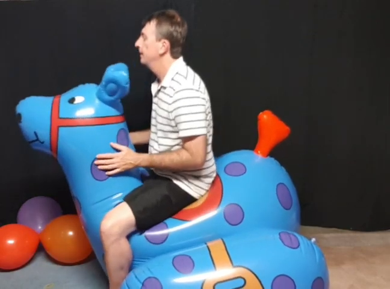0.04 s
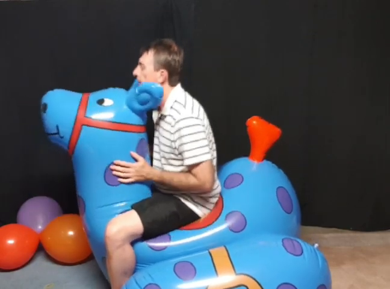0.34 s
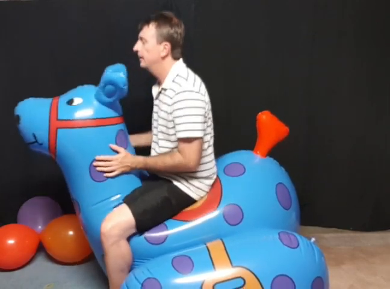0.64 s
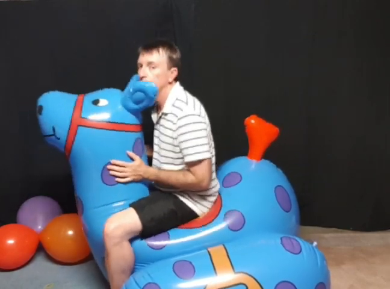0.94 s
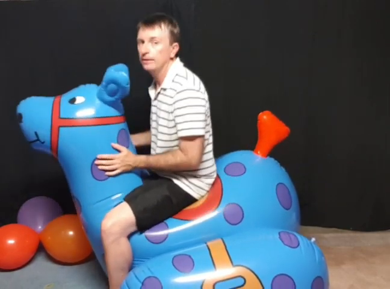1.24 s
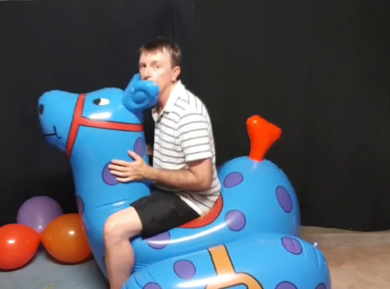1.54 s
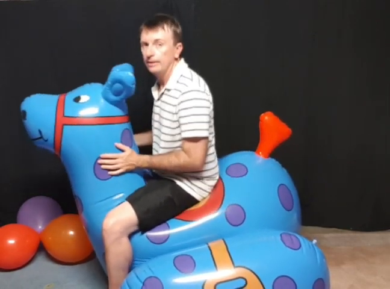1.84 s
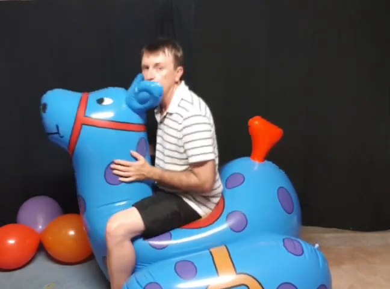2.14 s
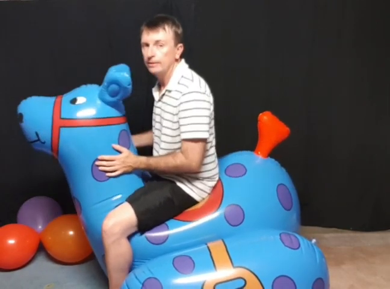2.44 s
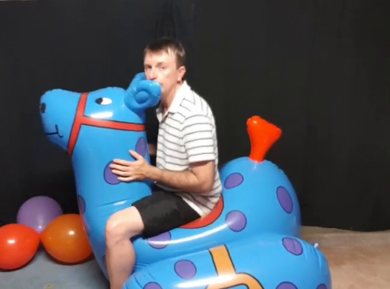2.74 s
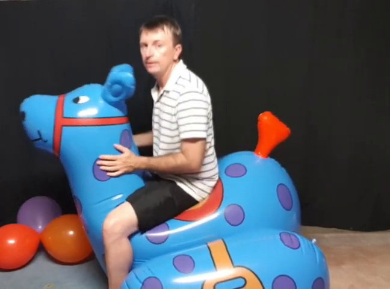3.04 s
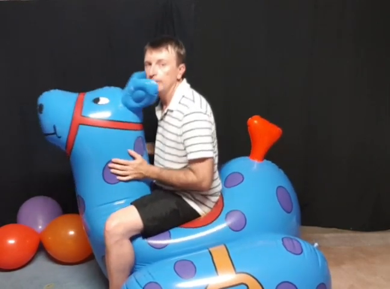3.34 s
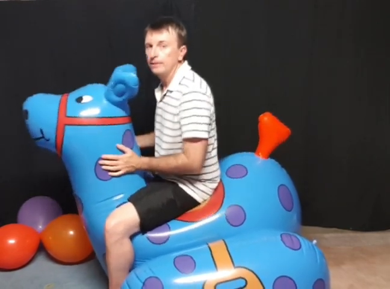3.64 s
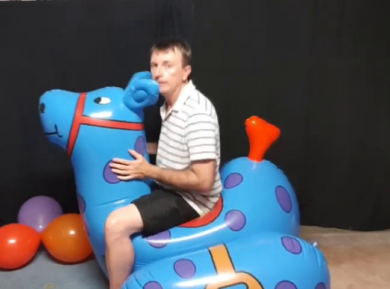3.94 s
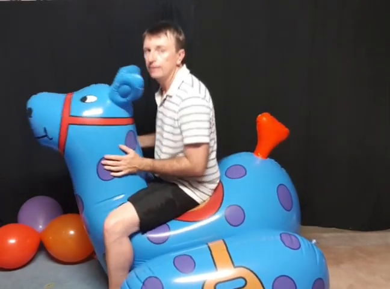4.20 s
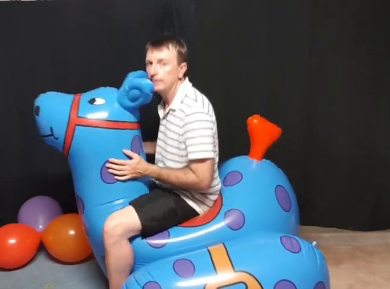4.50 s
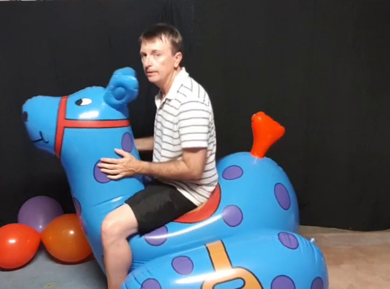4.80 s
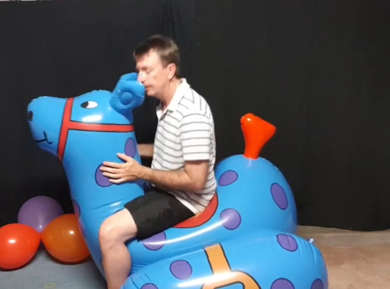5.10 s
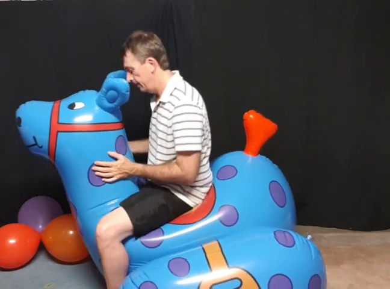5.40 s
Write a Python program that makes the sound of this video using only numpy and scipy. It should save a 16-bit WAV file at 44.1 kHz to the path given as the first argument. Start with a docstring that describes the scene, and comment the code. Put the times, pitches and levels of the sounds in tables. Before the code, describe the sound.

A person bounces on a large inflatable vinyl toy, nine times at an even pace. Each sinking makes a low, rubbery creak that slows, turns ragged and breaks into hard, hollow thumps, with a softer creak on the rebound. Folds crinkle lightly and cloth scuffs faintly. The bounces ease off, and one last creak swells at the end. It sounds fairly close, in a small, dry room with quiet rumble and hiss.

```python
"""A small curtained room: a person bounces on a large inflatable vinyl ride-on toy about every 0.6 s.
Each sinking and each rebound drags vinyl over vinyl: a low stick-slip creak that slows and turns ragged.
Under full weight the skin lets go in hard jerks that thump the air chamber, and the toy throbs deeply.
Its folds crinkle, cloth scuffs and skin squeaks faintly on the vinyl, over quiet rumble and hiss.
At the end the rider leans slowly forward into one last creak."""
import sys
import numpy as np
from scipy import signal
from scipy.fft import rfft, irfft
from scipy.io import wavfile
from scipy.ndimage import uniform_filter1d

SR = 44100
rng = np.random.default_rng(int(sys.argv[2]) if len(sys.argv) > 2 else 0)


def wrap_up_sound(samples):
    """Save the sound to the file named by the first command line argument, as 16-bit audio."""
    columns = np.atleast_2d(samples).T
    # keep every value between -1 and 1, then stretch to whole-number steps
    tamed = np.clip(columns, -1, 1)
    steps = np.round(tamed * 32767).astype(np.int16)
    wavfile.write(sys.argv[1], SR, steps)


N = 249606

# the rider sinks in, with layer levels ahead of the mix trims:
# (start [s], attack [s], push [s], opening slip rate [1/s], creak [dB], air chamber [dB], crinkle [dB])
SINKS = [(.26, 0.11, 0.12, 196, -26.5, -25.5, -48.5), (.858, 0.16, 0.11, 151, -27, -26.5, -48.5),
         (1.469, 0.13, 0.13, 151, -28, -28.5, -50.5), (2.075, 0.11, .121, 263, -28, -27, -49.5),
         (2.672, 0.14, 0.12, 175, -26.5, -26, -47.5), (3.298, 0.097, 0.13, 212, -29.5, -30.5, -52.5),
         (3.889, 0.13, .133, 200, -27.5, -28, -50), (4.511, 0.074, 0.11, 172, -29, -29.5, -51.5),
         (5.103, 0.099, 0.1, 173, -34, -29, -55)]
# the toy springs back: same columns
REBOUNDS = [(-.06, 0.049, 0.13, 161, -44.5, -41.5, -60.5), (.553, 0.054, 0.1, 250, -40, -42, -62),
            (1.15, 0.058, 0.085, 293, -38.5, -41, -63.5), (1.766, 0.052, 0.07, 255, -38.5, -45, -65.5),
            (2.367, 0.055, 0.087, 226, -37, -41.5, -59), (2.968, 0.063, 0.093, 263, -34, -41.5, -57),
            (3.587, 0.08, 0.083, 262, -34, -43, -58), (4.19, 0.079, 0.087, 233, -34, -44.5, -56.5),
            (4.841, 0.035, 0.046, 190, -46, -50.5, -78)]
# level curves of the closing lean: (time [s], creak [dB], air chamber [dB], crinkle [dB])
LEAN = [(5.38, -86, -66, -92), (5.42, -75, -51, -101), (5.51, -62, -42.5, -88), (5.555, -56.5, -46, -67.5),
        (5.635, -46.5, -39, -59), (5.66, -31, -37, -51)]
# body tone of the air chamber: (frequency [Hz], relative level [dB])
CHAMBER_TONE = [(25, -39.5), (42, -24), (56, -12.5), (75, -11), (100, -5.5), (135, -5.5), (170, 1),
                (220, -3.5), (290, -11.5), (500, -30), (1500, -101.5)]


def slips(ragged, size_spread_db=6, shimmer_db=2, stray=.45, count=90):
    """Vinyl sticks and slips on vinyl: a click train in which each stick tends to outlast the last."""
    out, step = np.zeros(N), np.arange(count)
    rows = strokes()
    ends = [row[0] for row in rows[1:]] + [N / SR]
    for (start, per_s, slowing, *_), end in zip(rows, ends):
        chance = rng.standard_normal((4, count))
        stick_s = (1 + slowing) ** step / per_s
        due = start + np.cumsum(stick_s) - stick_s
        disorder = np.interp(due * SR, np.arange(N), ragged)
        # a second, weaker patch of the contact lets go halfway through each stick
        for k, share in enumerate((1, .33)):
            times = due + stick_s * (k / 2 + .5 * disorder * chance[k])
            spread_db = shimmer_db + size_spread_db * disorder
            sizes = share * from_db(spread_db * np.clip(chance[k + 2], -2, 2))
            out -= clicks(times, sizes * (times > 0) * (times < end))
    # the rim of the contact gives way in small random slips
    return out + stray * ragged * grains(per_s=1100, spread_db=2.5)


def strokes(lean_slips_per_s=110):
    """Every sinking, rebound and lean in order of time: (start [s], opening slip rate [1/s], *course)."""
    # course: (growth per stick [share], opening raggedness [0-1], fraying time scale [s])
    sink_course, rebound_course, lean_course = (.024, .035, .16), (.042, .061, .22), (.012, .4, .087)
    rows = [(LEAN[0][0], lean_slips_per_s, *lean_course)]
    for table, course in ((SINKS, sink_course), (REBOUNDS, rebound_course)):
        rows += [(start, per_s, *course) for start, _, _, per_s, *_ in table]
    return sorted(rows)


def raggedness(ceiling=0.6935):
    """Each stroke loses its even rhythm as the load grows."""
    start, _, _, opening, fray_s = np.transpose(strokes())
    t = np.arange(N) / SR
    stroke = np.maximum(np.searchsorted(start, t, side="right") - 1, 0)
    age = t - start[stroke]
    return np.clip(opening[stroke] + (age / fray_s[stroke]) ** 2, 0, ceiling)


def rubbing_levels():
    """The rider's moves add up to three envelopes in dB: creak, air chamber and crinkle."""
    # envelope of a sinking, one row a layer:
    # (attack stretch [factor], attack curve [exponent], hold after the push [s], release [dB/s])
    sink_shapes = [(1.0, 1.136, 0.00092, 264.5), (1.25, 1.12, 0.016, 210), (.95, 2.3, .002, 155)]
    # envelope of a rebound: same rows and columns
    rebound_shapes = [(0.96, 1.35, 0.0011, 237), (1, 0.55, 0.042, 257), (1, 0.54, .002, 150)]
    # brief shifts of the seat: (time [s], half-length [s], creak [dB], air chamber [dB], crinkle [dB])
    seat_shifts = [(0.249, 0.016, -53.5, -44.5, -76), (1.3, 0.022, -53, -42, -73),
                   (1.969, 0.02, -55.5, -49.5, -69.5), (2.558, 0.021, -51, -66, -69),
                   (4.189, 0.033, -51.5, -43.5, -62.5), (4.363, 0.04, -47.5, -50.5, -86)]
    t = np.arange(N) / SR
    power = from_db(curves(np.array(LEAN))) ** 2 * (t > LEAN[0][0])
    for table, shapes in ((SINKS, sink_shapes), (REBOUNDS, rebound_shapes)):
        for start, attack_s, push_s, _, *levels_db in table:
            onset = int(start * SR)
            span = slice(max(onset, 0), min(onset + SR // 2, N))
            for layer, db, shape in zip(power, levels_db, shapes):
                layer[span] += (from_db(db) * swell(t[span] - start, attack_s, push_s, *shape)) ** 2
    for time, half_s, *levels_db in seat_shifts:
        power += np.outer(from_db(levels_db), bump(time, half_s)) ** 2
    return 10 * np.log10(power + 1e-12)


def swell(age, attack_s, push_s, stretch, curve, hold_s, release_db_per_s):
    """A stroke's envelope: a rounded attack, then a steady fade once push and hold are over."""
    attack = np.sin(np.pi / 2 * np.clip(age / (attack_s * stretch), 0, 1)) ** curve
    return attack * from_db(-release_db_per_s * np.maximum(age - push_s - hold_s, 0))


def sharpened(drive, creak_db, soft_hz=850, sharp_at_db=-29, growth=0.96):
    """Light rubbing gives rounded slips; their edges sharpen with pressure."""
    soft = butterworth(drive + 1e-18, 1, soft_hz, "low")
    edge = np.minimum(from_db(growth * (creak_db - sharp_at_db)), 1)
    return soft + edge * (drive - soft)


def vinyl_skin(drive):
    """A slip sends a short pulse through the taut skin and leaves its panels ringing."""
    # tone of one slip: (frequency [Hz], relative level [dB])
    slip_tone = [(90, -23), (170, -6.5), (280, -4.5), (350, 0.5), (440, 0.5), (560, 0), (720, 3.5),
                 (840, -2.5), (1150, -6), (1260, -16), (1600, -12.5), (2100, -20.5), (3000, -33.5),
                 (9000, -84)]
    # panel resonances: (frequency [Hz], bandwidth [Hz], boost [dB])
    panels = [(290.3, 20, 6), (409.5, 112, 7), (502.8, 14, 6.5), (586.3, 20, 7), (633, 19, 3),
              (715, 65, 1.5), (1126, 66, 5), (1340, 100, 8), (1670, 14, 1.5)]
    out = convolve(drive, pulse_of(slip_tone))
    for hz, width_hz, boost_db in panels:
        ring = signal.lfilter(*signal.iirpeak(hz, hz / width_hz, fs=SR), out)
        out = out + (from_db(boost_db) - 1) * ring
    return out


def jerks(thump_trim_db=-2, thump_lead_s=.001):
    """A stuck fold lets go at once: the pressure dips, with a crack and a thump of the chamber."""
    # the hardest jerks of the skin: (time [s], crack [dB], thump before its trim [dB])
    hard_jerks = [(0.327, -28, -13), (.346, -12.5, -14), (.371, -10.5, -24), (.378, -38, -23),
                  (.930, -18.5, -25), (0.955, -17.5, -9.5), (.978, -23, -20), (.99, -20.5, -32),
                  (1.549, -24, -14.5), (1.588, -20, -14.5), (1.604, -20.5, -29.5), (2.136, -27, -42),
                  (2.185, -38, -13), (2.191, -23, -15.5), (2.751, -21.5, -20.5), (2.782, -12.5, -13.5),
                  (2.806, -20.5, -15), (3.405, -23, -32), (3.422, -21, -20), (3.977, -18.5, -43),
                  (3.989, -28, -19), (4.002, -20, -23), (4.03, -22.5, -15.5), (4.6, -36, -15),
                  (4.621, -39, -18), (5.181, -33, -16), (5.197, -35, -33)]
    # tone of the crack: (frequency [Hz], relative level [dB])
    crack_tone = [(40, -13.5), (150, 8), (450, 14), (800, -6), (1500, 1.5), (2200, -14), (3500, -34),
                  (6000, -65.5), (9000, -87), (15000, -68)]
    times, crack_db, thump_db = np.transpose(hard_jerks + lesser_jerks())
    crack = convolve(clicks(times, from_db(crack_db)), pulse_of(crack_tone))
    kicks = clicks(times - thump_lead_s, from_db(thump_db + thump_trim_db))
    thump = convolve(kicks, pulse_of(CHAMBER_TONE))
    return -crack - thump


def lesser_jerks(count=2, early_s=.015, spread_s=.018, crack_offset_db=3.5, thump_offset_db=-4):
    """Small jerks scatter around the end of each sinking's push, scaled to its creak."""
    chance = np.clip(rng.standard_normal((len(SINKS), count, 3)), -2, 2)
    rows = []
    for (start, _, push_s, _, creak_db, *_), draws in zip(SINKS, chance):
        for when, crack, thump in draws:
            rows.append((start + push_s - early_s + spread_s * when,
                         creak_db + crack_offset_db + 2 * crack,
                         creak_db + thump_offset_db + 2 * thump))
    return rows


def air_chamber(drive, ragged, lurch=1.14):
    """The enclosed air hums with the slips and booms with uneven lurches of the load."""
    lurches = lurch * ragged * grains(per_s=150, spread_db=6.0)
    return levelled(convolve(drive + lurches, pulse_of(CHAMBER_TONE)), size=900)


def landings(hz=57, t60=0.22, rise_s=0.013, size=16384):
    """At the bottom of a bounce the whole toy gives one deep, soft throb."""
    # the rider's weight bottoms out: (time [s], peak level [dB])
    hits = [(0.343, -33.5), (0.946, -33), (1.563, -35), (2.18, -35), (4.01, -44), (4.605, -39)]
    times, db = np.transpose(hits)
    t = np.arange(size) / SR
    throb = np.sin(2 * np.pi * hz * t) * from_db(-60 * t / t60) * (1 - np.exp(-t / rise_s))
    return convolve(clicks(times, from_db(db)), throb / throb.max())


def crinkle(drive, rustle=0.96):
    """Folds tick with each slip and rustle in between."""
    # tone of a fold's tick: (frequency [Hz], relative level [dB])
    fold_tone = [(200, -33.5), (700, -3), (1400, 10), (2300, 0.5), (3200, -5), (4400, -12.5), (6000, -13),
                 (7200, -19), (9000, -27.5), (15000, -34.5)]
    ticks = drive + rustle * grains(per_s=3000, spread_db=1.5)
    return levelled(convolve(ticks, pulse_of(fold_tone)), size=900)


def scuffs():
    """Cloth slides over the vinyl in soft swishes of band-passed noise."""
    # swishes: (time [s], half-length [s], centre [Hz], filter bandwidth [Hz], level [dB])
    swishes = [(0.643, 0.048, 3340, 890, -72), (2.51, .068, 7800, 2000, -76.5),
               (3.047, 0.045, 2800, 910, -72), (3.666, .037, 2920, 895, -66),
               (3.953, 0.027, 5700, 1500, -62), (4.25, 0.046, 6400, 3000, -71),
               (5.17, 0.048, 5700, 2200, -66), (5.625, 0.077, 3650, 3180, -63.5)]
    out = np.zeros((2, N))
    for time, half_s, hz, width_hz, db in swishes:
        band = signal.iirpeak(hz, hz / width_hz, fs=SR)
        swish = signal.lfilter(*band, signal.lfilter(*band, rng.standard_normal((2, N))))
        out += from_db(db) * rms_one(swish) * bump(time, half_s)
    return out


def squeaks(waver_hz=130, rise_hz_per_s=3500):
    """Skin squeaks on vinyl: thin, unsteady tones that glide upward as they swell and fade."""
    # faint high squeaks: (time [s], half-length [s], pitch [Hz], level [dB])
    chirps = [(3.235, .045, 2550, -72), (5.105, .028, 2450, -67)]
    t, out = np.arange(N) / SR, np.zeros(N)
    waver = rms_one(butterworth(rng.standard_normal(N), 2, waver_hz, "low"))
    for time, half_s, hz, db in chirps:
        tone = np.sin(2 * np.pi * np.cumsum(hz + rise_hz_per_s * (t - time)) / SR)
        out += from_db(db) * waver * tone * bump(time, half_s)
    return out


def room(x, echo_s=0.004306, echo_db=-12, t60=0.19, mid_db=-10, side_db=-2, size=16384):
    """The curtained room returns one near reflection and a short diffuse tail."""
    t = np.arange(size) / SR
    mid, side = rng.standard_normal((2, size)) * from_db(-60 * t / t60) * (t > .003)
    mid = from_db(mid_db) * mid / np.linalg.norm(mid)
    side = from_db(side_db) * side / np.linalg.norm(side)
    side = butterworth(side, 1, 1000, "high")  # wide treble, centred bass
    tails = butterworth([mid + side, mid - side], 1, 260, "high")
    echo = from_db(echo_db) * np.interp(np.arange(N) - echo_s * SR, np.arange(N), x, left=0)
    return np.array([x + echo + convolve(x, tail) for tail in tails])


def room_tone(level_db=-58.5, wide_above_hz=900):
    """A quiet bed: room rumble in the centre, wide hiss above it."""
    # colour of the bed: (frequency [Hz], relative noise density [dB])
    bed_tone = [(15, -52.5), (25, 6), (107, -4.5), (164, -6), (340, -7.5), (410, -7.5), (567, -13),
                (666, -6.5), (1900, -22), (2560, -31.5), (3900, -29.5), (4500, -35), (5300, -28),
                (6800, -28.5), (7400, -39), (9050, -44.5), (12500, -36), (15500, -38)]
    mid, side = rng.standard_normal((2, N))
    side = butterworth(side, 1, wide_above_hz, "high")
    colour = response_of(bed_tone)
    bed = np.array([convolve(mid + sign * side, colour) for sign in (1, -1)])
    return from_db(level_db) * rms_one(bed)


def grains(per_s, spread_db):
    """Random tiny releases of uneven size."""
    born = rng.random(N) < per_s / SR
    return born * from_db(spread_db * np.minimum(rng.exponential(1, N), 4)) * rng.choice([-1, 1], N)


def clicks(times, sizes):
    """Impulses at the given times."""
    return np.bincount(np.clip(np.round(times * SR).astype(int), 0, N - 1), sizes, N)


def bump(time, half_s):
    """A bell-shaped swell, down to 1/e at half_s either side of its peak."""
    return np.exp(-np.minimum(((np.arange(N) / SR - time) / half_s) ** 2, 50))


def curves(rows):
    """Breakpoints (time [s], values...) drawn out to one curve a value column."""
    times, *columns = rows[np.argsort(rows[:, 0])].T
    return [np.interp(np.arange(N) / SR, times, column) for column in columns]


def response_of(spectrum, size=8192):
    """Minimum-phase impulse response of a tone curve (frequency [Hz], level [dB])."""
    hz, db = np.transpose(spectrum)
    grid = np.maximum(np.arange(size // 2 + 1) * SR / size, 1)
    gain = from_db(np.interp(np.log(grid), np.log(hz), db))
    cepstrum = irfft(np.log(gain))
    cepstrum[1:size // 2] *= 2
    cepstrum[size // 2 + 1:] = 0
    return irfft(np.exp(rfft(cepstrum)))


def pulse_of(spectrum):
    """A transient with the given tone curve and a peak of 1."""
    response = response_of(spectrum)
    return response / np.abs(response).max()


def convolve(x, response):
    """Pass a sound through an impulse response."""
    return signal.fftconvolve(x, response)[:N]


def butterworth(x, order, hz, kind):
    """Low-pass or high-pass filter."""
    return signal.sosfilt(signal.butter(order, hz, kind, fs=SR, output="sos"), x)


def levelled(x, size):
    """Ride the gain toward unit power, smoothing over size samples."""
    power = uniform_filter1d(uniform_filter1d(x ** 2, size), size)
    return x / np.sqrt(np.abs(power) + 1e-4 * np.mean(x ** 2))


def rms_one(x):
    """Scale to unit power."""
    return x / np.sqrt(np.mean(x ** 2) + 1e-20)


def from_db(db):
    """Decibels to gain."""
    return 10 ** (np.asarray(db) / 20)


def scene():
    """One train of slips drives skin, air chamber and folds; accents and room tone fill out the mix."""
    creak_db, chamber_db, crinkle_db = rubbing_levels()
    ragged = raggedness()
    drive = slips(ragged)
    creak = from_db(creak_db + 0.09) * levelled(vinyl_skin(sharpened(drive, creak_db)), size=600)
    boom = from_db(chamber_db - 2.5) * air_chamber(drive, ragged)
    # folds lie all over the toy, so left and right each get their own rustle
    folds = from_db(crinkle_db + 3.0) * np.array([crinkle(drive), crinkle(drive)])
    return room(creak + boom + jerks() + landings() + squeaks()) + folds + scuffs() + room_tone()


def record(dry, low_cut_hz=36, high_cut_hz=15750):
    """Each side gets its own colour; the deepest bass and the top are cut, and both ends are eased."""
    # tonal tilt between the two microphone ports: (frequency [Hz], left minus right [dB])
    port_tilt = [(100, 1.43), (800, 1.5), (1500, 0.5), (4000, 7.5), (6000, 11.5), (7500, -3), (9500, -2.5),
                 (13000, 1)]
    hz, tilt_db = np.transpose(port_tilt)
    colours = [response_of(np.column_stack([hz, sign * tilt_db / 2])) for sign in (1, -1)]
    heard = [convolve(x, colour) for x, colour in zip(dry, colours)]
    heard = butterworth(heard, 3, low_cut_hz, "high") * signal.windows.tukey(N, .001)
    return signal.sosfilt(signal.ellip(12, .1, 90, high_cut_hz, fs=SR, output="sos"), heard)


dry = scene()
out = record(dry)
wrap_up_sound(out)
```